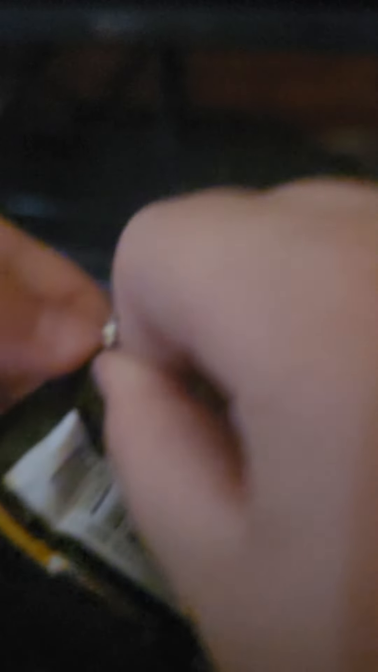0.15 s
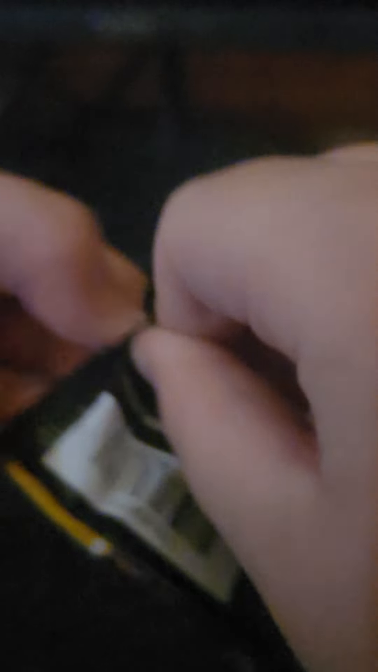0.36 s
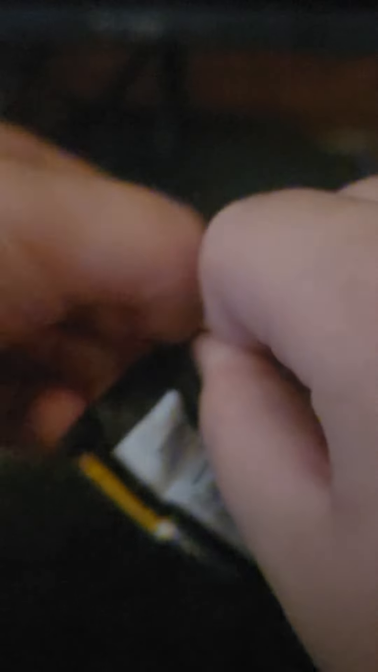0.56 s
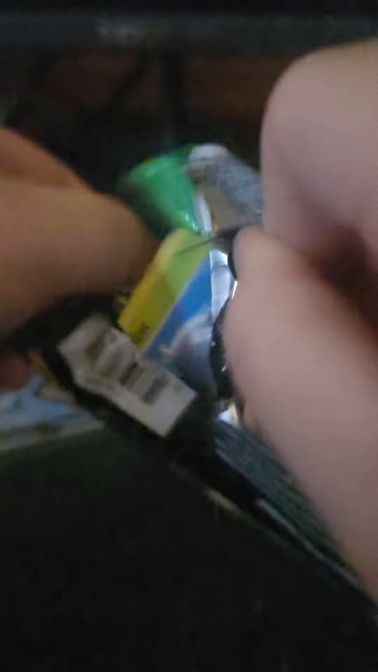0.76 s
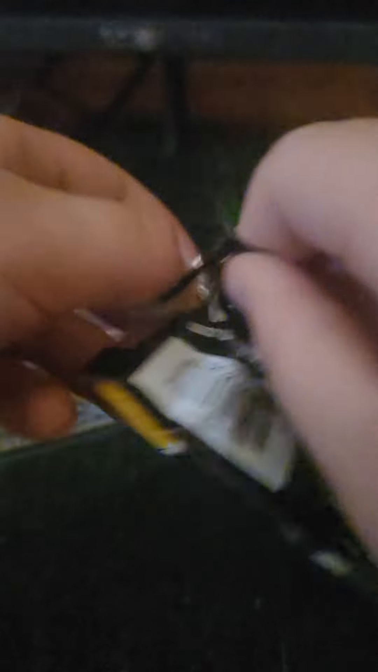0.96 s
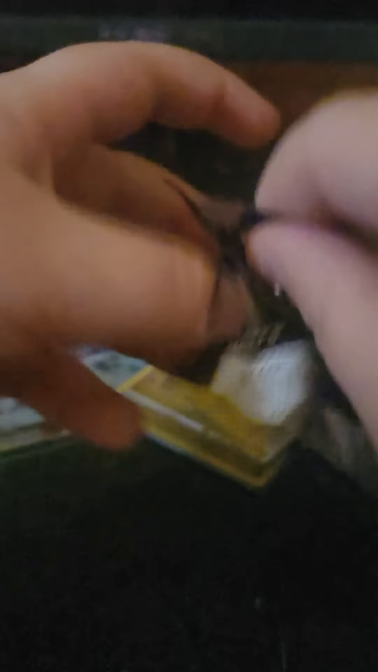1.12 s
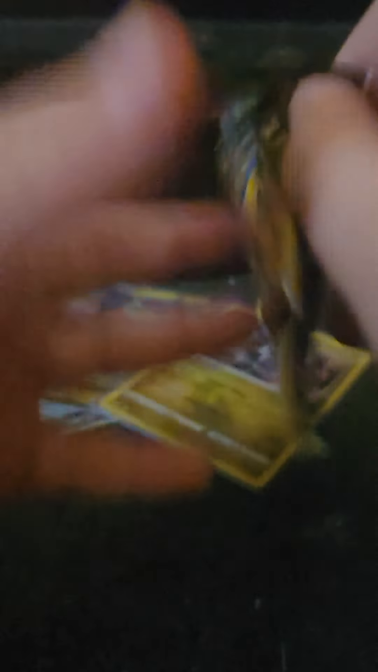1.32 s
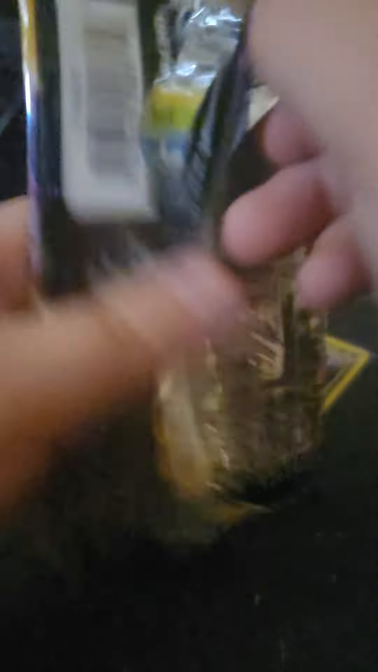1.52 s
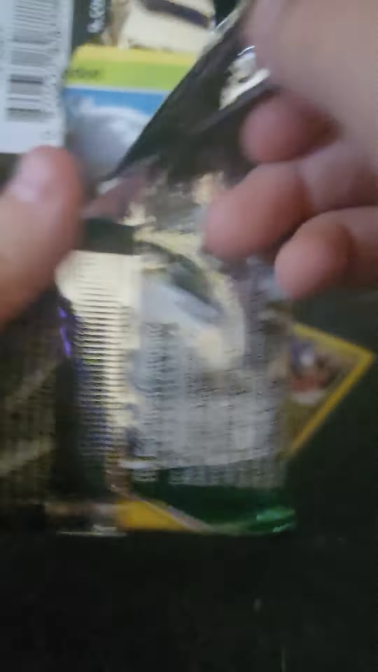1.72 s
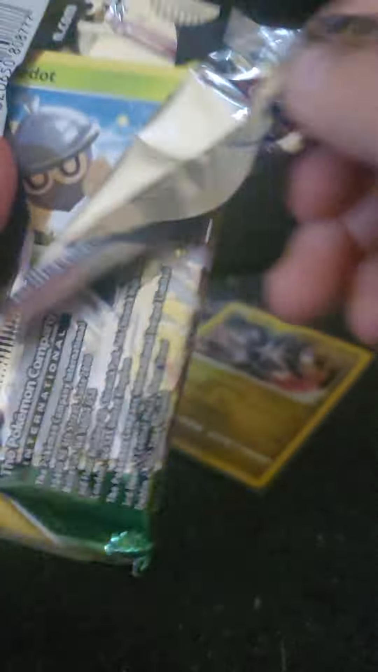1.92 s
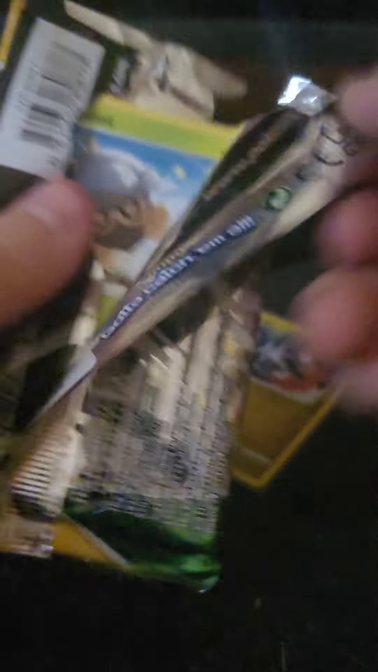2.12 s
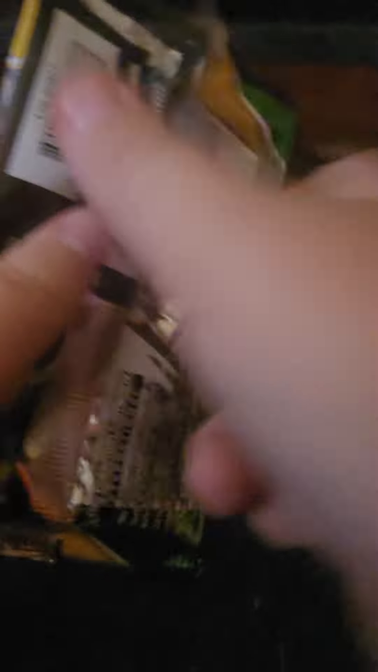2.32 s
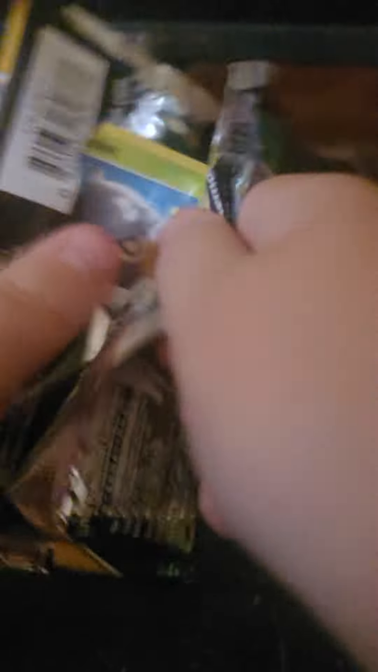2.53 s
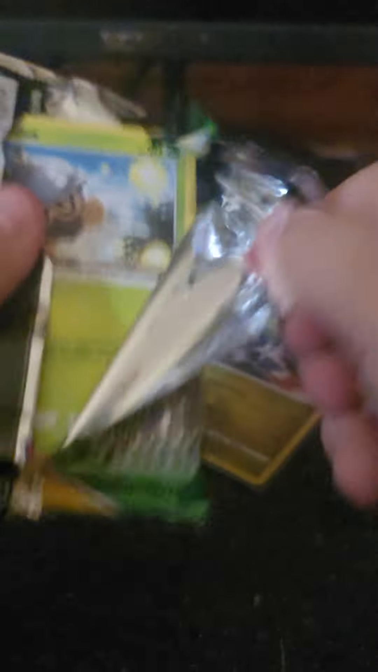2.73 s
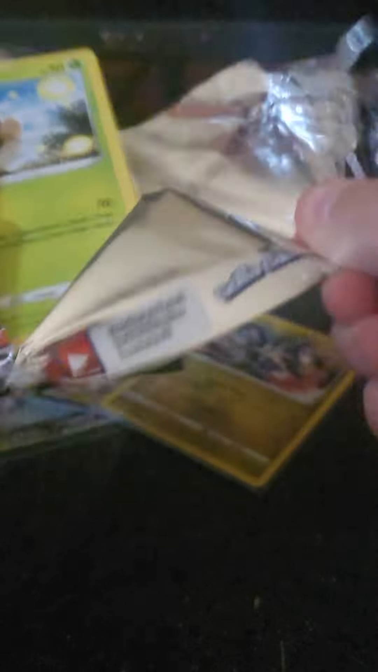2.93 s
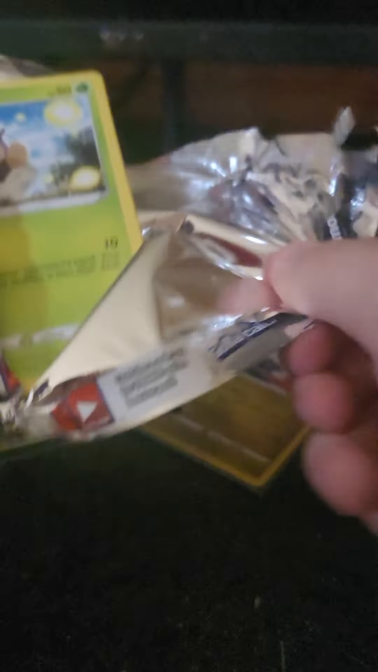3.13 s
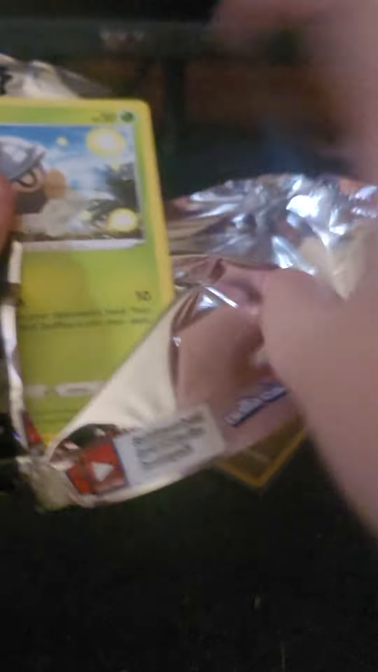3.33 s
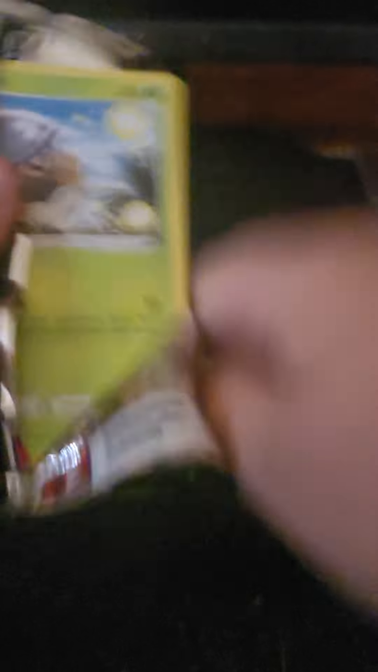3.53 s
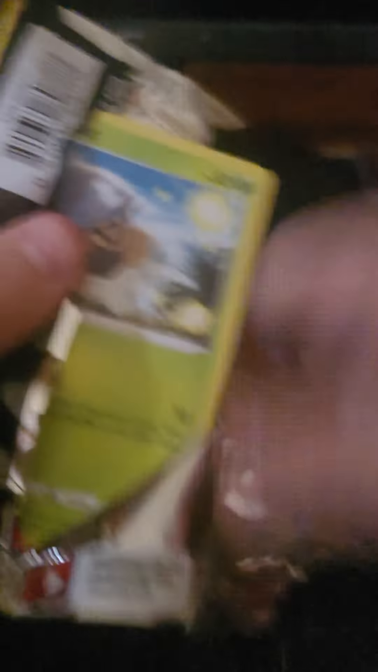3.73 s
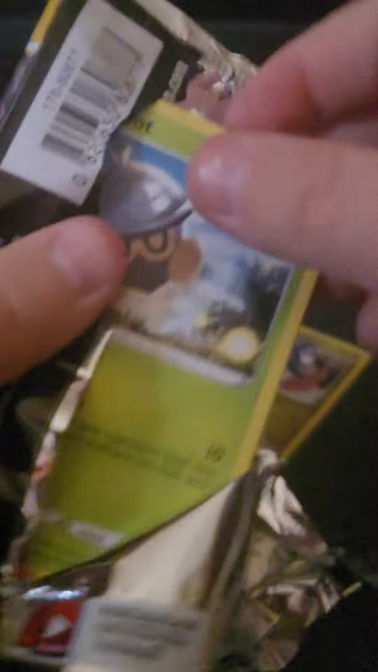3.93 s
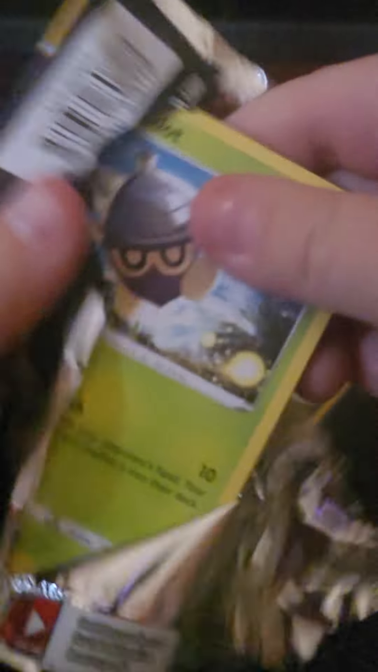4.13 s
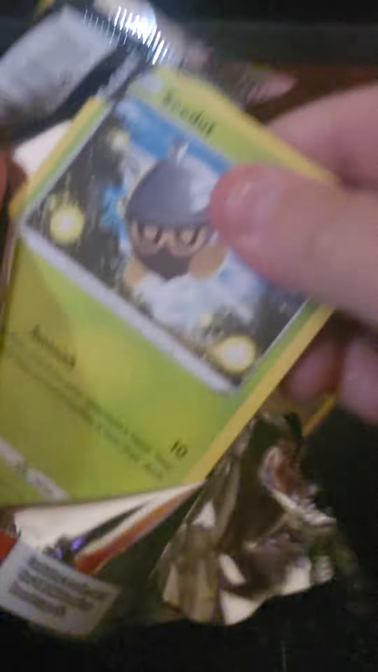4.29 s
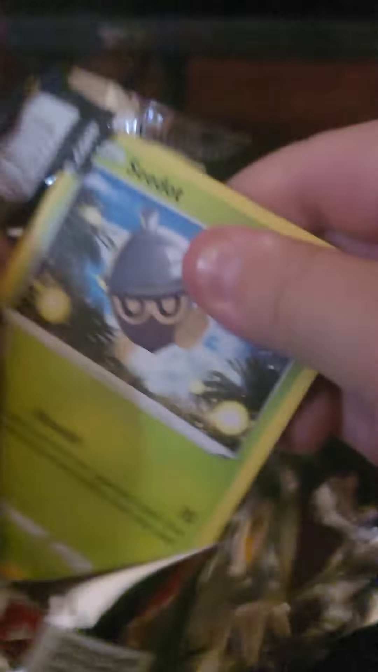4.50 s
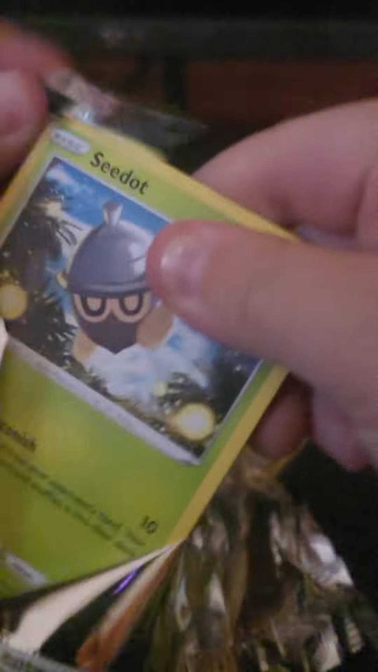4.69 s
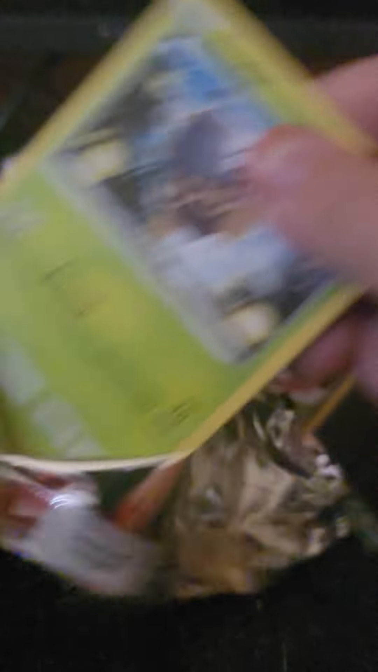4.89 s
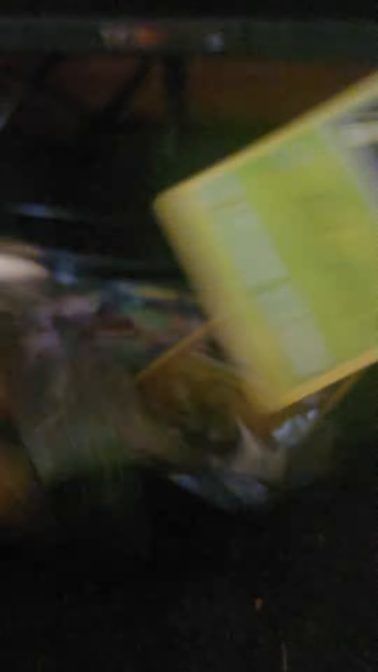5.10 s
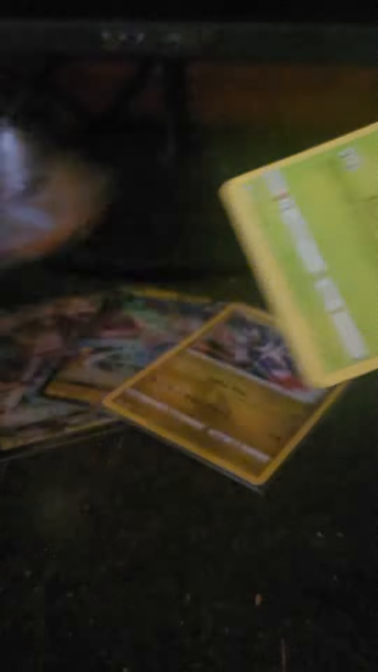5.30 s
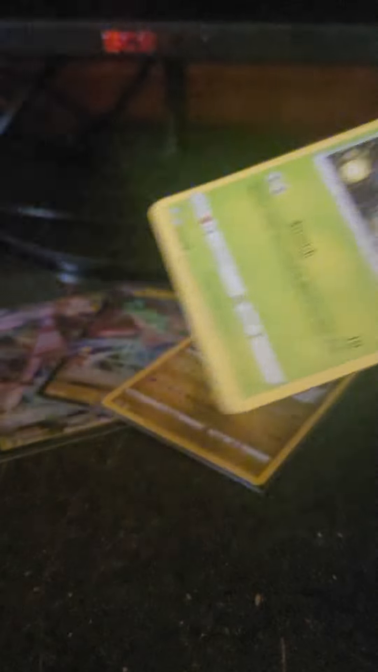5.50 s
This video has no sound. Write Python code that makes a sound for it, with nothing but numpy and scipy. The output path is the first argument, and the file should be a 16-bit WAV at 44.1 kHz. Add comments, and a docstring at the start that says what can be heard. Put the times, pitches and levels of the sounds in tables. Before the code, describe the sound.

Close stereo foil handling in a quiet furnished room. Sparse ticks give way to a loud crunch near the first second, then a raspy ripping seam at two seconds. Denser crackles and low-ringing snaps follow, with light knocks on a small card stack, another busy burst of snapping, and thinning rustle at the end.

```python
"""Opening a foil card pack

Hands peel open a foil pack of trading cards and work the cards out in a small, quiet room. Creases snap and
tiny facets crackle, both built from damped bending modes; a stick-slip seam tears as gated hiss. Palm bumps and
card edges tapping inside the pack are short damped modes. Two microphone ports hear the foil a fraction of a
millisecond apart, each with its own colour."""
import sys
import numpy as np
from scipy import signal
from scipy.fft import rfft, irfft
from scipy.io import wavfile
from scipy.ndimage import uniform_filter1d

SR = 44100
rng = np.random.default_rng(int(sys.argv[2]) if len(sys.argv) > 2 else 0)


def to_wav(sig):
    """Store sig (one row per channel, or 1-D mono) as 16-bit WAV at the path in sys.argv[1].

    Samples outside -1..1 are clipped; the rate is SR.
    """
    pcm = np.clip(np.atleast_2d(sig), -1, 1) * 32767
    pcm = np.round(pcm).astype(np.int16)
    wavfile.write(sys.argv[1], SR, pcm.T)  # frames by channels


N = 244755
TIME_S = np.arange(N) / SR
BODY_HZ, EDGE_HZ, TOP_HZ = 2000, 8000, 16000  # body below, edge above, top of the scene
PORT_LAG_S = 0.0002  # mean lag of the right port for the foil
SEAM_LAG_S = 0.000907  # the seam opens at one spot, so its lag is steady

# snapping creases: start_s, level_db (2-8 kHz), body_db (relative), edge_db (relative), ring_hz (of the facet)
CREASES = [(0.0335, -28.5, -14, -15, 5400), (0.0763, -31.5, -9, -11, 2770), (0.0987, -24, -37, -16, 6210),
           (0.492, -34.5, -6.5, -8, 4100), (0.57, -35, -5.5, -13, 4190), (0.722, -22.5, -4, -6.5, 3800),
           (0.8063, -12, -8.5, -9, 5770), (0.8859, -16.5, 0.5, -3, 1730), (0.943, -18, -13, 1, 6230),
           (1.027, -27, -30, -7, 5100), (1.1204, -23.5, -4.5, -9, 1920), (1.2196, -27.5, -6.5, -2.5, 6340),
           (1.3184, -34, -1, -3, 6440), (1.335, -24, 4, -2.5, 1870), (1.4991, -32, -3.5, 3, 6860),
           (1.723, -24.5, -25, -22, 6100), (1.8062, -25.5, -37, -14, 4350),
           (1.9159, -16.5, -15, -4.5, 6640), (1.9242, -16.5, -27, -7, 5760), (1.934, -20.5, -8.5, -9, 6700),
           (2.16, -22.5, -12, -25, 6270), (2.1726, -26.5, -13, -15, 5500), (2.1945, -16, -5, -2.5, 6040),
           (2.3229, -25.5, -9.5, -15, 985), (2.3347, -24, 3.5, -7, 990), (2.5128, -27, -18, -8, 6160),
           (2.5793, -24.5, -4.5, 1, 8870), (2.699, -25.5, -15, -8, 6150), (2.7285, -14.5, -15, -11, 2140),
           (2.743, -15, -2.5, -11, 915), (2.753, -17, 0.5, -13, 1770), (2.7902, -19, -6, -13, 1070),
           (2.8388, -27.5, -2.5, -33, 3350), (2.9373, -20, -11, -14, 5940), (2.945, -19, -9, -7, 6000),
           (2.9925, -22, 7, -0.5, 1230), (3.0077, -15.5, 0.5, -1, 1050), (3.071, -18, 1.5, 0, 1330),
           (3.1574, -30, 0, 0, 1210), (3.1678, -28.5, 7, 6.5, 1330), (3.1955, -27.5, -1, 3, 1270),
           (3.2859, -33, -8.5, -5, 4860), (3.3542, -29.5, -7, -7.5, 3430), (3.4169, -28.5, -6, -7.5, 1250),
           (3.5984, -17.5, -20, -16, 4900), (3.6746, -22.5, -0.5, -4, 1560), (3.698, -16, -5, -11.5, 5360),
           (3.764, -24.5, -7.5, -10, 4700), (4.134, -28, -12, -10, 3020), (4.215, -28, -5, -6, 1380),
           (4.309, -16.5, -11.5, -7, 6900), (4.344, -14, -3, -9.5, 2240), (4.363, -21, 1.5, -9, 2200),
           (4.453, -14, -26, -16, 5960), (4.5397, -25, -24, -12, 2350), (4.563, -15.5, -7, -17, 7230),
           (4.593, -20.5, -5.5, 0, 5700), (4.6029, -15.5, -15, -11, 7020), (4.7017, -16.5, -5, -7, 1020),
           (4.714, -21, -13, -15, 6000), (4.7432, -13.5, -9, -11.5, 3840), (4.8148, -20, -7, -14, 5340),
           (4.835, -22.5, -6, -8, 1280), (4.8639, -16, 1.5, -8, 1080), (4.934, -21.5, -12.5, -7, 5360),
           (4.9466, -21.5, -11, -2, 6300), (5.0057, -24.5, -4.5, -0.5, 3400), (5.0265, -22, -8, -5, 3400),
           (5.0502, -20.5, -2.5, -9, 2120), (5.0878, -20.5, -4, -8, 1820), (5.12, -20.5, -22, -2.5, 6800),
           (5.1946, -23.5, -7.5, -22, 5170), (5.287, -28, -3.5, -5.5, 6300), (5.3304, -25.5, -9, -27, 3430),
           (5.409, -28, -4, -18, 5140), (5.5061, -32.5, 4, -14, 1015)]


def undb(db):
    """Decibels to gain."""
    return 10 ** (np.asarray(db) / 20)


def unit(x):
    """Scale to rms 1."""
    return x / np.sqrt(np.mean(x ** 2))


def colour(x, points):
    """Causal minimum-phase filter whose gain follows (hz, db) points, by folding the cepstrum."""
    size = 2048
    hz, db = np.transpose(points)
    grid_hz = np.maximum(np.fft.rfftfreq(size, 1 / SR), 1)
    gain = undb(np.interp(np.log(grid_hz), np.log(hz), db))
    cepstrum = irfft(np.log(gain))
    cepstrum[1:size // 2] *= 2
    cepstrum[size // 2 + 1:] = 0
    response = irfft(np.exp(rfft(cepstrum)))
    response = response.reshape((1,) * (x.ndim - 1) + (-1,))
    return signal.oaconvolve(x, response, axes=-1)[..., :x.shape[-1]]


def split(x):
    """Body, middle and edge bands of a sound."""
    bands = [(BODY_HZ, "low"), ([BODY_HZ, EDGE_HZ], "band"), (EDGE_HZ, "high")]
    return [signal.sosfilt(signal.butter(3, hz, kind, fs=SR, output="sos"), x) for hz, kind in bands]


def steady(x, even_s):
    """Even out the power over about even_s."""
    width = int(even_s * SR)
    power = np.mean(x ** 2, axis=0)
    smooth_power = uniform_filter1d(uniform_filter1d(power, width), width)
    return x / np.sqrt(smooth_power + 1e-9)


def add(out, start_s, sound, lag_s=0):
    """Lay a short stereo sound into out at start_s, lag_s later on the right."""
    for port, part, delay_s in zip(out, sound, (0, lag_s)):
        i = min(max(int((start_s + delay_s) * SR), 0), N - 1)
        port[i:i + len(part)] += part[:N - i]


def lags(times_s, spread_s=0.00011):
    """Port lags of facets scattered over the pack."""
    return PORT_LAG_S + spread_s * rng.standard_normal(len(times_s))


def gesture(full_s, hold_s, rise_db_per_s, fall_db_per_s):
    """Gain of one hand movement: swells up to full_s, holds, then dies away."""
    rise_db = rise_db_per_s * np.maximum(full_s - TIME_S, 0)
    fall_db = fall_db_per_s * np.clip(TIME_S - full_s - hold_s, 0, 1)
    return undb(-rise_db - fall_db)


def ambience():
    """Faint steady hush of the room: coloured noise, independent at each port."""
    # hush spectrum: freq_hz, level_db
    hush_spectrum = [(25, -24), (60, 1.5), (160, -17.5), (470, -1), (900, -13.5), (4000, -12), (16000, -58)]
    return unit(colour(rng.standard_normal((2, N)), hush_spectrum)) * undb(-57.5)


def facets(main_hz, main_db, ring_s=0.00046, ring_slope=0.59, travel_s=0.001497, own_share=0.93,
           swell_s=0.00071, size=640, order=40):
    """Stereo clicks of flipping foil facets: a crack of random bending modes plus each facet's main mode."""
    # foil spectrum: freq_hz, level_db (per Hz)
    foil_spectrum = [(120, -14.5), (310, -11), (480, -3.5), (740, -2.5), (1100, 3), (1700, 0.5), (2800, -3),
                     (6000, -0.5), (11500, -8.5), (16000, -16.5)]
    t = np.arange(size) / SR
    cracks = np.zeros((len(main_hz), 2, size))
    for crack in cracks:
        edges_hz = np.linspace(np.sqrt(200), np.sqrt(TOP_HZ), order + 1) ** 2
        hz = edges_hz[:-1] + np.diff(edges_hz) * rng.random(order)
        decay_s = ring_s * (hz / 4000) ** -ring_slope
        # the buckle runs across the facet, so the modes start at different times
        age_s = np.maximum(t - travel_s * rng.random((order, 1)) ** 2, 0)
        # the higher a mode, the more differently it radiates towards each port
        port_gain = own_share * np.sqrt(hz / EDGE_HZ) * rng.standard_normal((2, order))
        gain = (rng.standard_normal(order) + port_gain) * np.sqrt(np.sqrt(hz) / decay_s)
        modes = np.exp(-age_s / decay_s[:, None]) * np.sin(2 * np.pi * hz[:, None] * age_s)
        crack += gain @ modes
    clicks = []
    for crack, hz in zip(colour(cracks, foil_spectrum), main_hz):
        # the main mode swells as the facet turns over; wide, low facets take longer
        swell = t * np.exp(-t / swell_s * np.sqrt(hz / BODY_HZ))
        ring = swell * np.sin(2 * np.pi * hz * t)
        clicks.append(unit(crack) + unit(ring) * undb(main_db))
    return np.array(clicks)


def crackle(per_s, spread_db, main_db, count=64):
    """Shower of tiny facet flips of very unequal size, at rms 1."""
    bank = facets(np.geomspace(1300, 9500, count), main_db)
    out = np.zeros((2, N))
    when, which, size = rng.random((int(per_s * N / SR), 3)).T
    times_s = when * N / SR
    gains = undb(-spread_db * np.log(1 - .99 * size))
    for start_s, k, gain, lag_s in zip(times_s, (which * count).astype(int), gains, lags(times_s)):
        add(out, start_s, bank[k] * gain, lag_s)
    return unit(out)


def panel(x, ring_db=-11.5, q=1.15):
    """The panel about to snap, or just snapped, lends its ring to the crackle around it."""
    times_s, *_, ring_hz = np.transpose(CREASES)
    midpoints_s = (times_s[1:] + times_s[:-1]) / 2
    parts = np.split(x, np.sort(midpoints_s * SR).astype(int), axis=1)
    rings = [signal.lfilter(*signal.iirpeak(hz, q, fs=SR), part) for hz, part in zip(ring_hz, parts)]
    return x + undb(ring_db) * np.hstack(rings)


def wrapper(resting_db=-61.5, grip_db_per_s=1001, relax_db_per_s=337, edge_db=-1.0, gentle_edge_db=-4.0,
            dense_from_db=-21.0, dense_range_db=7.5):
    """Squeezed foil: gentle handling ticks sparsely, a hard squeeze crunches densely; held foil ticks faintly."""
    # squeezes or shifts of the foil: full_grip_s, hold_s, level_db, body_db (relative)
    squeezes = [(0.0, 0.015, -29, -17), (0.72, 0.0044, -42, -8), (0.819, 0.029, -16.5, -7.5),
                (0.876, 0.083, -28.5, -13), (0.973, 0.045, -38, -2.5), (1.122, 0.045, -40, -5.5),
                (1.286, 0.11, -37, -10), (1.639, 0.0082, -39.5, -4), (1.717, 0.085, -36, -10.5),
                (2.517, 0.057, -39.5, -16), (2.564, 0.0077, -33, -9), (2.742, 0.018, -19, -6.5),
                (2.704, 0.016, -32, -5.5), (2.919, 0.1, -34, -3.5), (2.999, 0.062, -22, -2.5),
                (3.166, 0.041, -37.5, -7.5), (3.295, 0.08, -43, -10), (3.416, 0.0064, -36, -3),
                (3.558, 0.02, -39, -1), (3.586, 0.0035, -25.5, -2), (3.635, 0.08, -30, -6),
                (3.773, 0.033, -37, -3.5), (3.944, 0.69, -44, -7.5), (4.323, 0.018, -23, -5.5),
                (4.543, 0.049, -29.5, -3), (4.674, 0.084, -32.5, 0), (4.834, 0.047, -30, -3),
                (4.955, 0.067, -35.5, -5), (4.988, 0.17, -32.5, -8), (5.19, 0.026, -34.5, -15),
                (5.259, 0.041, -34, -10), (5.386, 0.042, -35.5, -5.5)]
    power = body_power = undb(resting_db) ** 2
    for full_s, hold_s, level_db, body_db in squeezes:
        grip = (undb(level_db) * gesture(full_s, hold_s, grip_db_per_s, relax_db_per_s)) ** 2
        power = power + grip
        body_power = body_power + grip * undb(body_db) ** 2
    dense = 1 / (0.5 + np.exp((dense_from_db - 10 * np.log10(power)) / dense_range_db))
    ticks = np.sqrt(1 - dense) * crackle(per_s=310, spread_db=6.0, main_db=-6.5)
    crunch = np.sqrt(dense) * crackle(per_s=2000, spread_db=3.5, main_db=-12.0)
    # a big flip relieves the foil around it, which evens out the power
    low, middle, edge = (steady(band, even_s=0.084) for band in split(panel(ticks + crunch)))
    treble = middle + edge * undb(edge_db + gentle_edge_db * (2.0 - dense))
    return np.sqrt(body_power) * low + np.sqrt(power) * treble


def snaps(low_cut_hz=414.0, level_s=0.0042):
    """Large creases give way singly, each with its ring; wide facets have more body, tight ones more edge."""
    out = np.zeros((2, N))
    times_s, *_, ring_hz = np.transpose(CREASES)
    # a single crease is too small to radiate much bass
    low_cut = signal.butter(2, low_cut_hz, "high", fs=SR, output="sos")
    clicks = signal.sosfilt(low_cut, facets(ring_hz, main_db=-4))
    for (start_s, level_db, body_db, edge_db, _), click, lag_s in zip(CREASES, clicks, lags(times_s)):
        for band, band_db in zip(split(click), (body_db, 0, edge_db)):
            energy = np.sum(band ** 2) / 2
            # the level is the rms of the band's energy spread over level_s
            gain = undb(level_db + band_db) * np.sqrt(level_s * SR / energy)
            add(out, start_s, band * gain, lag_s)
    return out


def blow(modes, peak_db, swell_s, apart_rad, size=10000):
    """Soft blow: damped modes swell and die, randomly detuned and out of step between the ports."""
    t = np.arange(size) / SR
    ring = 0
    for hz, db in modes:
        phase = 2 * np.pi * rng.random() + apart_rad * rng.standard_normal((2, 1))
        detuned_hz = hz * (1 + 0.065 * rng.standard_normal())
        ring = ring + undb(db) * np.sin(2 * np.pi * detuned_hz * t + phase)
    ring = ring * t ** 2 * np.exp(-t / swell_s)
    return ring * undb(peak_db) / np.abs(ring).max()


def bumps(lift_db=4.0):
    """Palms bump and flex the pack dully, close to the microphone: a few low damped modes."""
    # bumps: start_s, level_db (peak before lift_db), pitch_hz
    handling = [(0.845, -39.5, 53.8), (0.898, -45, 94.3), (1.275, -49, 92.5), (1.331, -43, 88.5),
                (1.378, -45, 86), (1.448, -49, 86), (2.308, -48, 70), (3.049, -46, 77.4), (3.694, -46, 89),
                (3.937, -46.5, 79), (4.693, -42, 99), (4.863, -46.5, 71)]
    # low modes of a bump: pitch_multiple, level_db
    thud_modes = [(1, 5.5), (1.4, -3), (2.2, -10)]
    out = np.zeros((2, N))
    for start_s, level_db, pitch_hz in handling:
        modes = [(multiple * pitch_hz, mode_db) for multiple, mode_db in thud_modes]
        add(out, start_s, blow(modes, level_db + lift_db, swell_s=0.0096, apart_rad=0.53))
    return out


def tear(slips_per_s, release_s=0.0018, uneven=0.27, own_share=0.6):
    """The seam sticks and slips; each slip releases a decaying puff of fine hiss, partly its own at each port."""
    # tear spectrum: freq_hz, level_db (per Hz)
    tear_spectrum = [(400, -22.5), (1200, -3.5), (2200, -0.5), (2700, -6), (3200, -1), (4500, -0.5),
                     (6100, 9.5), (8200, 1), (12000, 0), (16000, -12)]
    wander = np.repeat(rng.standard_normal(N // 200 + 1), 200)[:N]
    phase = np.cumsum(slips_per_s * np.exp(uneven * wander)) / SR % 1
    spray = colour(rng.standard_normal((3, N)), tear_spectrum)
    gate = uniform_filter1d(np.exp(-phase / slips_per_s / release_s), size=12)
    left, right = (spray[0] + own_share * spray[1:]) * gate
    right = np.roll(right, int(SEAM_LAG_S * SR))
    return steady(np.array([left, right]), even_s=0.03)


def seam(tear_db=0.5, tighten_db_per_s=1403, slacken_db_per_s=700):
    """Each pull peels a stretch of seam, which rasps at about that pull's slip rate."""
    # pulls: full_pull_s, hold_s, level_db (before tear_db), slips_per_s (nominal)
    pulls = [(1.922, 0.014, -25, 530), (1.956, 0.029, -27, 590), (2.021, 0.03, -33.5, 173),
             (2.049, 0.049, -25.5, 600), (2.116, 0.096, -32, 110), (2.274, 0.013, -23.5, 730)]
    gains = np.array([undb(level_db) * gesture(full_s, hold_s, tighten_db_per_s, slacken_db_per_s)
                      for full_s, hold_s, level_db, _ in pulls])
    slips_per_s = np.array(pulls)[gains.argmax(axis=0), -1]  # the strongest pull sets the rate
    return gains.max(axis=0) * tear(slips_per_s) * undb(tear_db)


def knocks():
    """Card edges tap against each other inside the pack, and the grip damps the stack's modes at once."""
    # knocks: start_s, level_db (peak)
    card_knocks = [(2.742, -21.5), (3.452, -35.5), (3.944, -33.5), (3.984, -39), (4.026, -34),
                   (4.041, -37.5), (4.098, -45), (4.129, -39), (4.167, -42), (4.866, -25.5),
                   (5.261, -29.5)]
    # modes of the held stack: freq_hz, level_db
    stack_modes = [(190, -2.5), (290, 0.5), (470, 9), (960, 3)]
    out = np.zeros((2, N))
    for start_s, level_db in card_knocks:
        add(out, start_s, blow(stack_modes, level_db, swell_s=0.0023, apart_rad=0.66))
    return out


def room(x, tail_db=-11.0, t60_s=0.16, treble_t60_s=0.19, near_db=-5.5, near_s=0.0029, size=20000):
    """Quick reflections from hands and table, then a furnished room's short tail, as decaying noise."""
    # tail colour: freq_hz, gain_db
    tail_colour = [(100, -4), (340, -7), (470, 5), (600, -5.5), (2000, 0.5), (6000, 3), (16000, -5)]
    t = np.arange(size) / SR
    low, middle, edge = split(rng.standard_normal((2, size)))
    tail = (low + middle) * undb(-60 * t / t60_s) + edge * undb(-60 * t / treble_t60_s)
    tail = colour(tail * (1 - np.exp(-t / near_s)), tail_colour)
    near = rng.standard_normal((2, size)) * np.exp(-t / near_s) * (t > SEAM_LAG_S)
    response = (unit(tail) * undb(tail_db) + unit(near) * undb(near_db)) / np.sqrt(size)
    return x + signal.fftconvolve(x, response, axes=1)[:, :N]


def turn(x):
    """Delay the phase by frequency as the right port does."""
    # right port phase: freq_hz, delay_rad
    port_phase = [(250, 0), (750, 2.5), (1000, 2.5), (1200, 1.0), (1900, 0.6), (2300, 2.0), (3000, -1),
                  (6000, 0)]
    delay_rad = np.interp(np.fft.rfftfreq(2 * N, 1 / SR), *np.transpose(port_phase))
    return irfft(rfft(x, 2 * N) * np.exp(-1j * delay_rad))[:N]


def scene():
    """Foil, seam and cards in the room, with close bumps and the room's hush."""
    return room(snaps() + wrapper() + seam() + knocks()) + bumps() + ambience()


def record(dry):
    """Each port colours the sound; peaks clip at full scale; a steep low-pass cuts the top."""
    # port colours: freq_hz, gain_db
    left_port = [(480, 4.5), (720, 3), (1650, -0.5), (2100, -3), (2700, 1), (6200, -3), (15000, 3)]
    right_port = [(480, 5.5), (950, -2), (1300, 1.5), (1650, -1.5), (2100, 3.5), (2600, -1.5), (6200, 2.5),
                  (8000, 0), (11000, 2), (14500, -3)]
    ports = np.array([colour(dry[0], left_port), colour(turn(dry[1]), right_port)])
    top_cut = signal.ellip(8, .2, 70, TOP_HZ, fs=SR, output="sos")
    return signal.sosfilt(top_cut, np.clip(ports, -1, 1))


dry = scene()
out = record(dry)
to_wav(out)
```